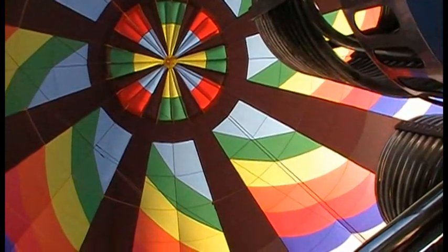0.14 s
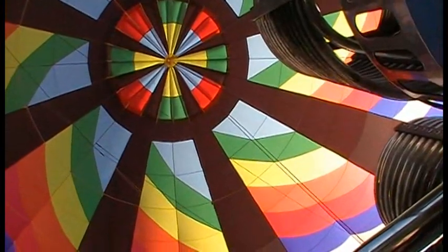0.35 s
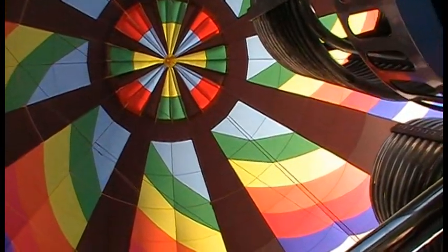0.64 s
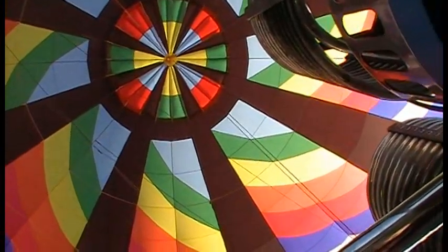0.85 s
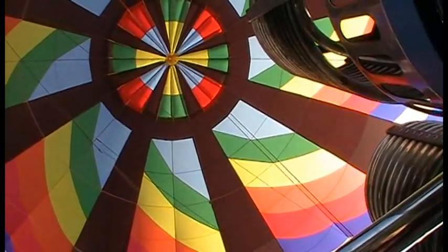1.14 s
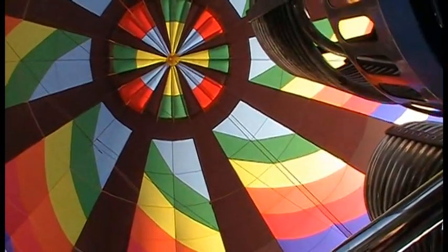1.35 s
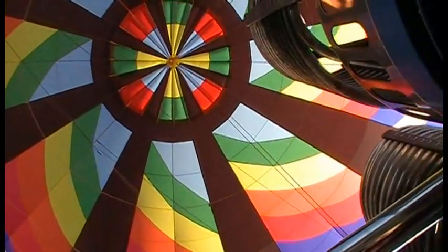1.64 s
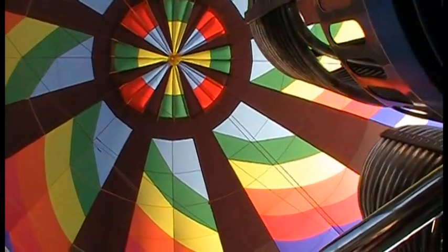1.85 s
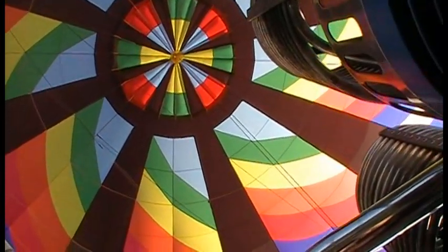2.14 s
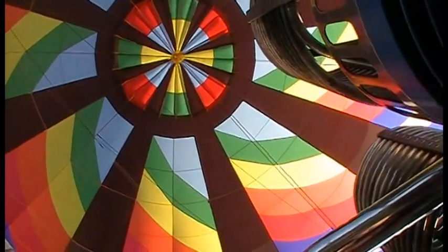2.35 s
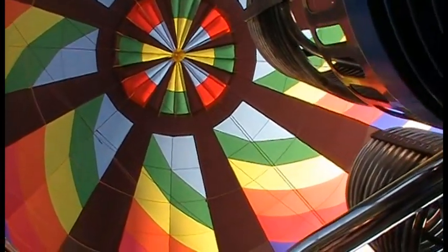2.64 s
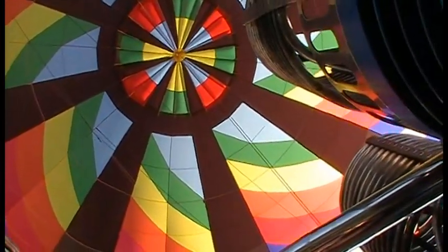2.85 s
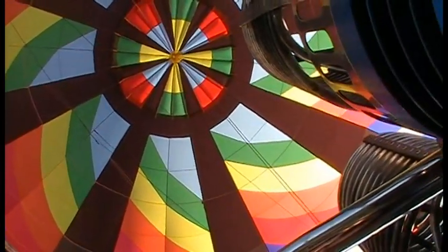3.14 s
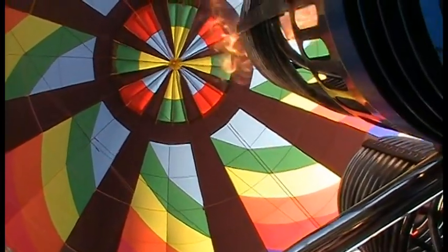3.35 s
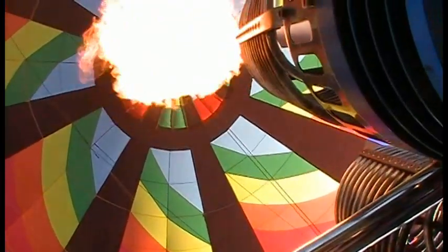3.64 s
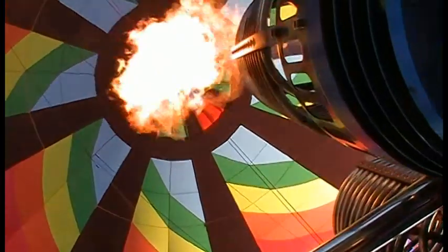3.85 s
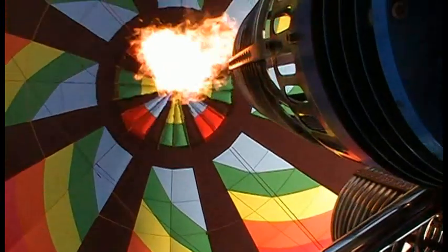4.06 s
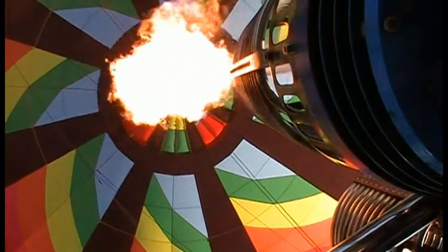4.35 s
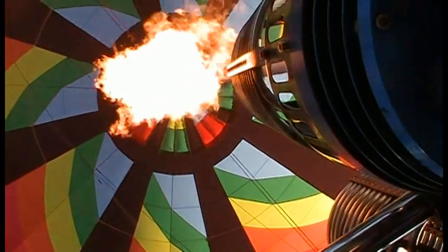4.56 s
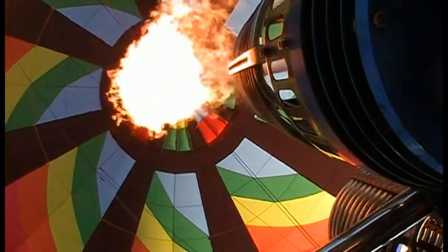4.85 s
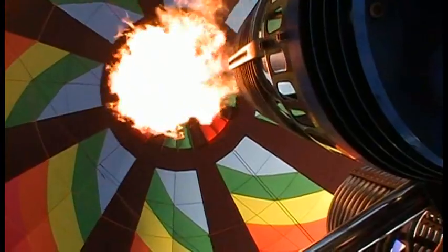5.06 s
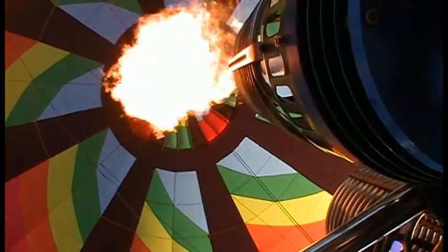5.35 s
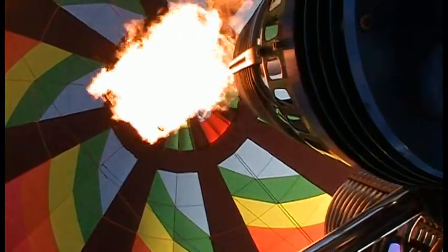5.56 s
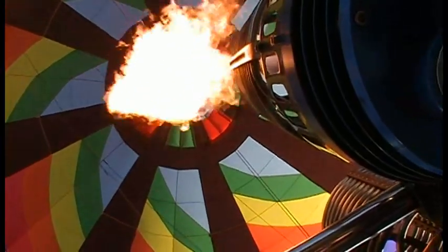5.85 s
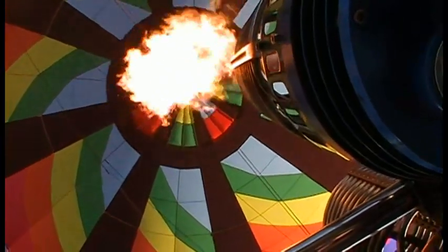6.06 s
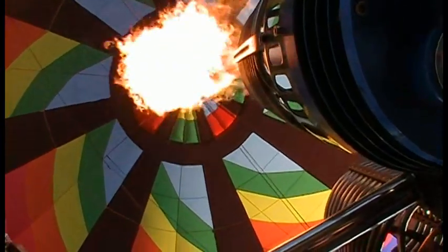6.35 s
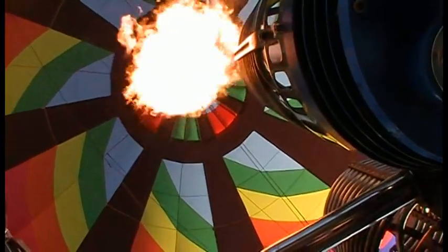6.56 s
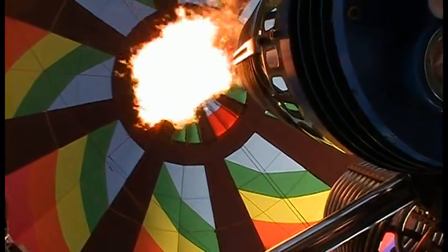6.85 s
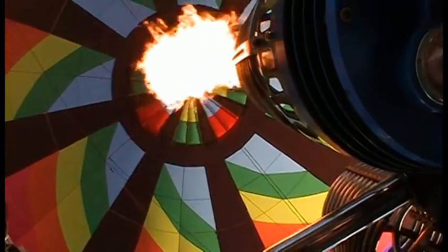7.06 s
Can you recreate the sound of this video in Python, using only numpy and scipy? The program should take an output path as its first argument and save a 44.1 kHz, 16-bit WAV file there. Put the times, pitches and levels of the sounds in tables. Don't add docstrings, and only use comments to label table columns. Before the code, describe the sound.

Outdoors, a hand-held stereo microphone sits close to a balloon's propane burner. From 0 to 2.6 seconds a small pilot flame hisses steadily, bright and slightly resonant, sagging a little and dipping briefly near 1.6, 2.1 and 2.5. Soft spits puff at 0.6, 1.8 and 2.4; a lever ticks at 2.05. A far engine drones and wavers beneath, with faint camera hum. At 2.6 the valve whistles thin and high, unlit gas screams, and at 2.73 it ignites with a low thump and small pops, another at 3.1. A loud, dense roar with harsh ringing hiss fills the scene, stuttering at first, its hiss shifting upward by 3.6, then fluttering and surging. At 6.43 it snaps shut; embers die within a tenth of a second. The hiss, duller and much quieter at first, swells back until the end around 7.2, the distant engine faint beneath.

```python
import sys
import numpy as np
from scipy import signal
from scipy.io import wavfile
from scipy.ndimage import uniform_filter1d

SR = 44100
rng = np.random.default_rng(int(sys.argv[2]) if len(sys.argv) > 2 else 0)


def master(y):
    cut = np.clip(np.atleast_2d(y).T, -1, 1)
    pcm = np.round(cut * 32767)
    wavfile.write(sys.argv[1], SR, pcm.astype(np.int16))


def voltage_ratio(decibels):
    exponent = np.asarray(decibels, float) / 20
    return 10 ** exponent


N = 318402

TURNED_S = 4
OPEN_S, LIT_S, SHUT_S = 2.63, 2.733, 6.431


def evened(x):
    return x / np.sqrt(np.mean(x ** 2) + 1e-20)


def read(points, hz, axis=1):
    table = np.transpose(points)
    return np.interp(np.log(hz + 1), np.log(table[0] + 1), table[axis])


def follow(rows, t, axis=1):
    table = np.transpose(rows)
    return np.interp(t, table[0], table[axis])


def sounding(rows, rise_s, fall_s, axis):
    t = np.arange(N) / SR
    fade_in = np.clip((t - rows[0][0]) / rise_s, 0, 1)
    fade_out = np.clip((rows[-1][0] - t) / fall_s, 0, 1)
    return voltage_ratio(follow(rows, t, axis=axis)) * fade_in * fade_out


def band(x, low, high, soft):
    return (np.tanh((x - low) / soft) - np.tanh((x - high) / soft)) / 2


def humps(rows, t, soft):
    return sum(height * band(t, s - length / 2, s + length / 2, soft * length) for s, length, height in rows)


def ringing(modes, hz, wider):
    return sum(voltage_ratio(2 * db) / (1 + (2 * (hz - f) / (width * wider)) ** 2) ** 2 for f, width, db in modes)


def colour(body, hz, under_db, ring_db):
    broad, rings, dips = body
    power = voltage_ratio(2 * (read(broad, hz) - under_db)) + voltage_ratio(2 * ring_db) * ringing(rings, hz, 0.99)
    dips_db = sum(db * np.exp(-((hz - f) / width) ** 2) for f, width, db in dips)
    return 10 * np.log10(power) + dips_db


# frequency in Hz, likeness 0-1, lead of the right port in radians.
PORT_LIKENESS = [(50, .99, 0), (1000, .988, .1), (3500, .965, .1), (4500, .985, .05), (6300, .985, .05),
                 (7000, .97, .1), (8000, .96, .1), (8300, .5, 1), (9500, .78, 1.2), (11500, .55, 1.1),
                 (15000, .5, .7)]


def turbulence(field, span_s, size, pan, patchy_db, flicker_db):
    hop = size // 4
    first, last = round(span_s[0] * SR), min(round(span_s[1] * SR), N)
    t = (first + np.arange((last - first) // hop + 5) * hop) / SR
    hz = np.fft.rfftfreq(size, 1 / SR)
    a, b, c, d, patches = rng.standard_normal((len(t), 5, len(hz))).transpose(1, 0, 2)
    patches = uniform_filter1d(patches, size=3000 // hop, axis=0)
    patches = evened(uniform_filter1d(patches, size=size // 80, axis=1))
    flicker = evened(uniform_filter1d(a[:, :1], size=4, axis=0))
    same = np.clip(read(PORT_LIKENESS, hz), 0, 1)
    left = a + 1j * b
    right = same * left + np.sqrt(1 - same ** 2) * (c + 1j * d)
    right = right * np.exp(1j * read(PORT_LIKENESS, hz, axis=2))
    side = voltage_ratio(read(pan, hz) / 2)
    gain = voltage_ratio(field(t[:, None], hz) + patchy_db * patches + flicker_db * flicker)
    z = np.array([left * side, right / side]) * gain
    noise = signal.istft(z.transpose(0, 2, 1), nperseg=size, noverlap=size - hop)[1]
    out = np.zeros((2, N))
    out[:, first:last] = noise[:, :last - first]
    return out


def levelled(x, lo_hz, hi_hz):
    hz, power = signal.welch(np.trim_zeros(x.mean(0)), SR, nperseg=1024)
    return x / np.sqrt(power[(hz > lo_hz) & (hz < hi_hz)].sum() * hz[1])


def ducking_db(t):
    push_start_s, push_end_s, push_db = 2.6, 2.67, -9.5
    creep_s, creep_db_per_s = 6.55, 23
    down = push_db * np.clip((t - push_start_s) / (push_end_s - push_start_s), 0, 1)
    return np.minimum(down + creep_db_per_s * np.maximum(t - creep_s, 0), 0)


# middle in seconds, length in seconds, level in dB.
ENGINE_SWELLS = [
    [(.4, 1.02, -48), (1.35, .52, -46), (1.915, .38, -43.5), (2.43, .43, -45), (6.72, .42, -50), (7.17, .1, -53)],
    [(.22, .5, -55), (1.07, .56, -50), (1.675, .33, -45.5), (2.08, .24, -47.5), (2.52, .27, -49), (7.08, .34, -49)],
    [(.9, .3, -53), (1.43, .36, -56), (1.78, .2, -54), (2.22, .2, -51), (2.53, .16, -53), (6.98, .1, -56)],
]


def engine():
    t = np.arange(N) / SR
    turns = np.where(t < TURNED_S, 43.5, 42.5) * t
    waver = uniform_filter1d(rng.standard_normal((3, N)), size=1200)
    waver_db = 2.2 * evened(uniform_filter1d(waver, size=1200))
    orders = 0
    for k, swells in enumerate(ENGINE_SWELLS):
        carried = humps([(s, length, voltage_ratio(db)) for s, length, db in swells], t, .12) + voltage_ratio(-68)
        orders = orders + carried * voltage_ratio(waver_db[k]) * np.sin(2 * np.pi * (12 + k) * turns)
    return voltage_ratio(3.0 + ducking_db(t) * (t > TURNED_S)) * orders * voltage_ratio([[-.6], [.6]])


# middle in seconds, length in seconds, depth in dB.
SHADOWS = [
    (1.62, 0.17, -4.5),
    (2.11, 0.22, -4.5),
    (2.5, 0.074, -4),
]


def near_level_db(t):
    start_db, sag_db_per_s, turned_db = -34.5, -0.5, -38
    level_db = np.where(t > TURNED_S, turned_db, start_db + sag_db_per_s * t)
    return level_db + 0.28 * humps(SHADOWS, t, .3) + ducking_db(t)


# frequency in Hz, level in dB, change when turned in dB.
HUM = [(62, -80, 5), (146, -69, 11), (189, -64.5, 7), (223, -63.5, 5), (253, -58, -2), (314, -68, -8),
       (380, -63.5, -4)]


def camera_hum():
    t = np.arange(N) / SR
    hum = sum(voltage_ratio(db + 37.0 + turned_db * (t > TURNED_S)) * np.sin(2 * np.pi * hz * t)
              for hz, db, turned_db in HUM)
    return voltage_ratio(near_level_db(t)) * hum


# frequency in Hz, width in Hz, level in dB.
PILOT_FACING = [
    [(40, -38), (100, -24), (200, -13.5), (300, -9.5), (450, -3.5), (900, 0), (1500, -2), (2200, -3.5), (4000, -7.5), (6300, -8), (9200, -7), (12000, -13.5), (12600, -19), (15000, -23), (15800, -30)],
    [(1910, 220, -6), (2504, 280, 0), (2900, 170, -1.5), (3556, 170, -1.5), (4710, 260, -1.5), (5890, 160, -2.5), (6740, 260, -6), (7460, 260, -5.5), (8420, 250, -2), (8800, 150, -3), (10250, 270, -4.5), (10700, 200, -9), (11700, 350, -10), (13200, 500, -9.5), (14100, 300, -16)],
    [(2230, 79, -7), (3940, 140, -2), (6700, 200, 0.5), (9100, 250, -2.5), (11100, 200, 0.5), (12750, 200, -7)],
]
PILOT_TURNED = [
    [(40, -43), (100, -23), (200, -4), (400, -2), (600, 2), (1100, 2.5), (2000, -3), (3300, -4.5), (4600, -6.5), (8000, -8), (11500, -7.5), (12200, -15), (15000, -19), (15800, -29)],
    [(2480, 130, 0), (3010, 160, 2), (3850, 270, 1), (4900, 250, -6), (7840, 600, -4), (8900, 200, -1), (9770, 220, -9), (10800, 340, -6), (12100, 140, -9.5), (13400, 500, -15)],
    [(2270, 130, -3), (9500, 250, -4), (10150, 200, 1), (11900, 120, -7), (12700, 250, -7), (13950, 200, -5)],
]
# frequency in Hz, left over right in dB.
PILOT_PAN = [(60, -0.5), (110, 0), (200, -5), (380, -2.5), (700, -4.5), (1290, -3.0), (2380, -4.5),
             (4400, -6), (8120, 0.5), (15000, -7.5)]


def pilot():
    sag_db_per_s, turned_treble_db = -0.8, -1.4

    def field(t, hz):
        turned = t > TURNED_S
        shape = np.where(turned, colour(PILOT_TURNED, hz, 0.092, -1.2), colour(PILOT_FACING, hz, 0.11, -1))
        treble_db = np.where(turned, turned_treble_db, sag_db_per_s * t)
        treble_db = treble_db + 0.76 * humps(SHADOWS, t, 0.42) + 1.4
        return shape + treble_db * band(hz, 2500, 30000, 1600)
    t = np.arange(N) / SR
    hiss = turbulence(field, (0, 8), size=1024, pan=PILOT_PAN, patchy_db=0.17, flicker_db=0.46)
    centred = voltage_ratio(np.outer([.6, -.6], t > TURNED_S))
    return voltage_ratio(near_level_db(t)) * levelled(hiss, 700, 3900) * centred


SPIT_S = [.6288, .6288, .6288, 1.805, 2.3688, 2.3700, 2.3692, 2.374]
# peak in dB, centre in Hz, width in Hz, t60 in seconds.
SPITS = [(-21, 5300, 500, 0.18), (-26, 9800, 3000, .08), (-19, 7660, 1600, 0.22), (-25.5, 7100, 1300, .16),
         (-18, 9600, 4100, 0.14), (-13.5, 7200, 1500, 0.16), (-21, 5500, 700, 0.15),
         (-18.5, 3750, 900, 0.15)]
# frequency in Hz, left over right in dB.
BLAST_PAN = [(60, -0.5), (110, -0.5), (200, -1.0), (380, -0.5), (700, -2.5), (1290, -1), (2380, -2.5),
             (4400, -3.5), (8120, 2.5), (15000, -7.5)]


def spits():
    rise_s, hold_s = .0007, .008
    out, t = np.zeros((2, N)), np.arange(N) / SR
    for s, (db, hz, width, t60) in zip(SPIT_S, SPITS):
        def field(_, f):
            return 10 * np.log10(ringing([(hz, width, 0)], f, 1) + 1e-6)
        puff = turbulence(field, (s, s + 1 / 4), size=256, pan=BLAST_PAN, patchy_db=-1.5, flicker_db=-1.5)
        decay_db = -60 * np.maximum(t - s - hold_s, 0) / t60
        front = np.clip((t - s) / rise_s, 0, 1)
        out += voltage_ratio(db - 10.5 + decay_db) * front * levelled(puff, 100, 16000)
    return out


# time in seconds, whistle in dB, body in dB, edge tones in dB.
CRACK = [(2.6, -50, -50, -62), (2.609, -37, -36, -52), (2.628, -37, -42, -37.5), (2.648, -28, -39, -32),
         (2.657, -24, -26, -22), (2.662, -25, -25, -21.5), (2.667, -22, -37, -28), (2.676, -15, -30, -26),
         (2.68, -37, -29, -29), (2.695, -37, -34, -29), (2.708, -25, -42, -27), (2.718, -31, -42, -29),
         (2.74, -44, -44, -35)]
# frequency in Hz, width in Hz, level in dB.
EDGE_TONES = [(3550, 240, -10), (4200, 190, -3), (4540, 3300, -13.5), (5920, 260, 0), (7650, 250, -8),
              (9030, 370, 0)]
WIDER_TONE = [(5270, 300, -2)]
SEAT_TONES = [(1390, 200, 0), (1730, 61, -2)]


def valve():
    whistle_hz, waver_hz, waver_db = 5965, 35, 1.5
    span_s = (2.55, 2.8)

    def edge_field(t, hz):
        wider = np.clip((t - 2.68) / .015, 0, 1)
        power = ringing(EDGE_TONES, hz, 0.83) + wider * ringing(WIDER_TONE, hz, 1) + 1e-4
        return 10 * np.log10(power) - 25 * band(hz, -500, 900, 200)

    def seat_field(_, hz):
        return 10 * np.log10(ringing(SEAT_TONES, hz, 1) + 1e-7)
    edge = turbulence(edge_field, span_s, size=256, pan=BLAST_PAN, patchy_db=1.5, flicker_db=2.8)
    seat = turbulence(seat_field, span_s, size=512, pan=BLAST_PAN, patchy_db=2.0, flicker_db=-0.5)
    waver = evened(uniform_filter1d(rng.standard_normal((N, 2)), size=100, axis=0)).T
    phase = 2 * np.pi * np.cumsum(whistle_hz + waver_hz * waver[1]) / SR
    whistle = voltage_ratio(waver_db * waver[0]) * np.sin(phase)
    return (sounding(CRACK, 0.01, .02, axis=1) * whistle
            + sounding(CRACK, .009, 0.023, axis=2) * levelled(seat, 1000, 2200)
            + sounding(CRACK, .009, 0.018, axis=3) * levelled(edge, 8400, 9500))


# start in seconds, peak in dB, start in Hz, end in Hz, length in seconds.
THUMPS = [
    (2.046, -29.5, 1920, 1890, 0.01),
    (2.7135, -20, 1590, 890, 0.0027),
    (2.741, -18.5, 399, 182, 0.0315),
    (2.744, -26.5, 167, 99, 0.027),
    (2.7935, -15, 520, 330, 0.0064),
    (3.129, -13, 895, 497, 0.0036),
]


def thumps():
    out = np.zeros((2, N))
    for s, db, start_hz, end_hz, length in THUMPS:
        hz = np.geomspace(start_hz, end_hz, round(length * SR))
        push = np.sin(2 * np.pi * np.cumsum(hz) / SR) * signal.windows.tukey(len(hz), .6)
        out[:, round(s * SR):][:, :len(hz)] += voltage_ratio(db) * push * voltage_ratio([[-.6], [.6]])
    return out


def cold(t):
    warming_s, warm_s = 3.2, 3.66
    return np.clip((warm_s - t) / (warm_s - warming_s), 0, 1)


# frequency in Hz, level in dB.
ROAR = [(24, -62), (40, -51), (143, -7), (274, -1.5), (413, -1), (503, -3), (713, -0.5), (1090, -3),
        (1410, -9.5), (1500, -25), (1950, -17), (3300, -120)]
# middle in seconds, length in seconds, change in dB.
BILLOWS = [(2.752, 0.022, 4), (2.782, 0.036, -7), (3.05, 0.11, -1), (3.44, 0.061, -3), (3.5, .05, 3),
           (3.79, 0.23, -2.6), (4.25, 0.074, -3.5), (4.4, 0.046, -6), (4.53, 0.066, -3.5),
           (4.78, 0.038, -5), (5.35, 0.073, -2.5), (5.49, .07, 1), (5.62, 0.1, 1.5), (6.15, 0.057, 1.5),
           (6.3, 0.11, -0.5)]


def flame():
    level_db, cold_db, belly_db, flutter_db = -25, 1.5, 1.7, 0.06
    fall_db_per_s, ember_db, ember_fall_db_per_s, ember_s = 296, -8, 107, 0.062

    def field(t, hz):
        return read(ROAR, hz) + belly_db * cold(t) * band(hz, 330, 650, 120)
    roar = turbulence(field, (2.6, 6.6), size=1024, pan=BLAST_PAN, patchy_db=0.14, flicker_db=1.0)
    t = np.arange(N) / SR
    flutter = uniform_filter1d(rng.standard_normal(N), size=1500)
    flutter = evened(uniform_filter1d(flutter, size=1500))
    size_db = cold_db * cold(t) + humps(BILLOWS, t, 0.49) + flutter_db * flutter
    after_s = np.maximum(t - SHUT_S, 0)
    embers_db = ember_db - ember_fall_db_per_s * after_s - 500 * np.maximum(after_s - ember_s, 0)
    dying_db = np.maximum(-fall_db_per_s * after_s, embers_db)
    lit = np.clip((t - LIT_S) / 0.009, 0, 1)
    return voltage_ratio(level_db + size_db + dying_db) * lit * levelled(roar, 100, 1280)


# end of the shift in seconds, length in seconds, change during it in
# dB, change just after it in dB, dying away.
FALTERS = [(2.908, .14, 4.5, 6), (3.1, 0.1, 3, 5), (3.517, 0.33, -0.5, 3), (3.847, .11, -0.2, -0.5),
           (4.082, 0.13, -1, 0.5), (4.303, 0.13, 1, 3), (4.533, 0.11, 0, 1.4), (4.85, 0.11, -0.5, 2),
           (5.542, 0.212, -3, 1), (5.667, 0.034, 1.5, 0), (6.316, 0.098, -4, -3), (6.596, 0.2, -6.5, .1)]


def flow_db(t):
    in_s, out_s, surge_s = 0.01, 0.0096, 0.11
    total_db = 0
    for s, length, sag_db, surge_db in FALTERS:
        sag = (np.tanh((t - s + length) / in_s) - np.tanh((t - s) / out_s)) / 2
        surge = (t > s) * np.exp(-abs(t - s) / surge_s)
        total_db = total_db + sag_db * sag + surge_db * surge
    return total_db


# frequency in Hz, width in Hz, level in dB.
JET_COLD = [
    [(880, -24), (1500, -2.5), (2090, -5), (3280, -10.5), (5110, -8), (5630, -7), (7780, -3), (10100, -6), (11300, -8.5), (12800, -5.5), (15000, -20), (15600, -35)],
    [(5140, 76, 1), (5230, 130, -6), (6030, 120, 1), (6870, 160, 4), (7550, 180, 3.5), (7840, 60, 1), (9300, 220, -9), (10200, 150, -3), (12700, 270, -13), (13300, 50, -19)],
    [(5800, 100, -6), (9600, 200, -2), (6570, 200, -4), (11000, 300, -2), (13900, 200, -12)],
]
JET_HOT = [
    [(880, -25.5), (1500, -3), (2160, -4.5), (3380, -10.5), (5740, -5.5), (6460, -5), (6990, -3.5), (8090, -1.5), (8750, -4), (10300, -6.5), (14000, -15.5), (15600, -33)],
    [(3940, 570, -8.5), (4930, 160, -6), (5620, 120, -5), (5900, 130, -4), (6920, 340, 0.5), (7450, 150, -4), (8020, 230, -1), (9300, 190, -7), (9200, 200, -14), (9930, 260, -1.5), (11850, 200, -7), (13600, 300, -15), (14600, 250, -18)],
    [(2680, 120, -1.5), (4570, 130, -2), (5780, 60, -2), (7700, 90, -0.5), (6550, 170, -3.5), (8900, 240, -1.5), (11300, 260, -3), (13350, 150, -8), (14300, 200, 0)],
]


def jet():
    jet_db, rise_db_per_s, fall_db_per_s, rush_db, rush_s = -30, 70, 358, 2, 0.5
    flow_body, flow_ring, flow_fizz = 0.54, 0.65, 0.71
    unlit_ring_db, unlit_fizz_db, cold_ring_db, cold_fizz_db = 5.5, 8, -2, -9
    fizz_wakes_s = 3.26

    def field(t, hz):
        shape = cold(t) * colour(JET_COLD, hz, 1.9, -5.5) + (1 - cold(t)) * colour(JET_HOT, hz, 1.0, -0.89)
        unlit = band(t, OPEN_S + .02, LIT_S - .01, 0.0069)
        asleep = band(t, 0, fizz_wakes_s, .05)
        ring_db = flow_ring * flow_db(t) + unlit_ring_db * unlit + cold_ring_db * cold(t) + .6
        fizz_db = flow_fizz * flow_db(t) + unlit_fizz_db * unlit + cold_fizz_db * asleep + .6
        return shape + ring_db * band(hz, 4600, 10400, 500) + fizz_db * band(hz, 10500, 30000, 500)
    hiss = turbulence(field, (2.55, 6.6), size=512, pan=BLAST_PAN, patchy_db=0.76, flicker_db=1.0)
    t = np.arange(N) / SR
    first_rush_db = rush_db * np.exp(-np.maximum(t - LIT_S, 0) / rush_s)
    valve_db = -rise_db_per_s * np.maximum(LIT_S - t, 0) - fall_db_per_s * np.maximum(t - SHUT_S, 0)
    opened = np.clip((t - OPEN_S) / 0.034, 0, 1)
    gain = voltage_ratio(jet_db + first_rush_db + valve_db + flow_body * flow_db(t)) * opened
    return gain * levelled(hiss, 2095, 5410)


def scene():
    return engine() + camera_hum() + pilot() + spits() + valve() + thumps() + flame() + jet()


def top_cut(x):
    return signal.sosfilt(signal.butter(12, 15650, fs=SR, output="sos"), x)


def record(dry):
    heard = signal.sosfilt(signal.butter(2, 55, "high", fs=SR, output="sos"), dry)
    limited = 1.2 * np.tanh(heard / 1.2)
    return top_cut(limited)


dry = scene()
out = record(dry)
master(out)
```